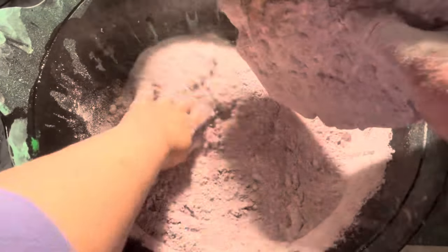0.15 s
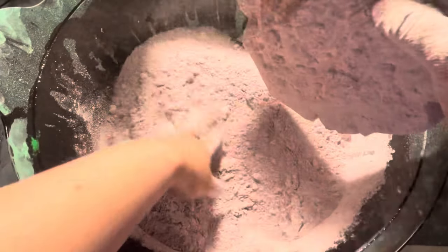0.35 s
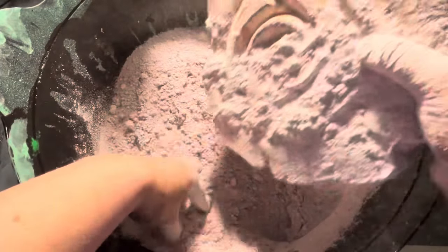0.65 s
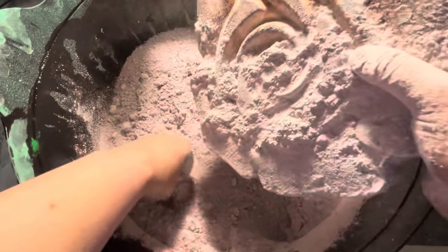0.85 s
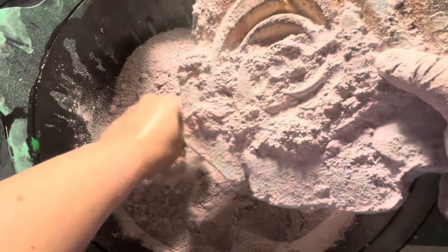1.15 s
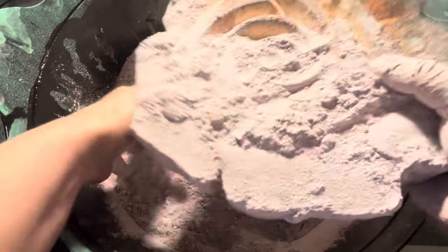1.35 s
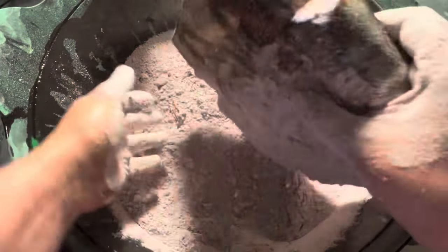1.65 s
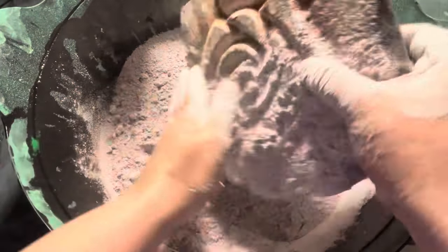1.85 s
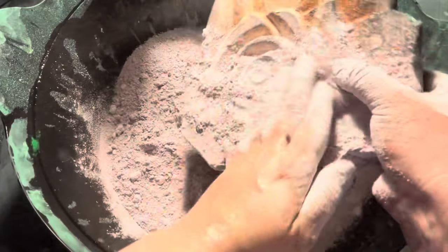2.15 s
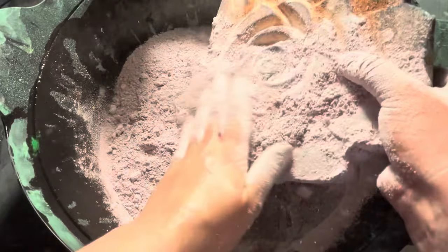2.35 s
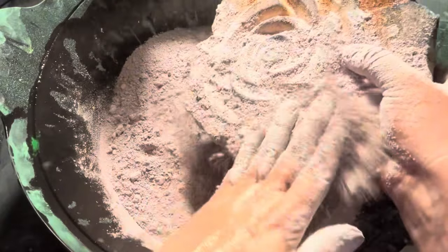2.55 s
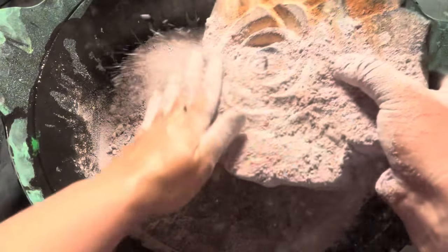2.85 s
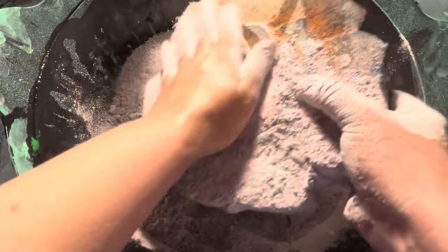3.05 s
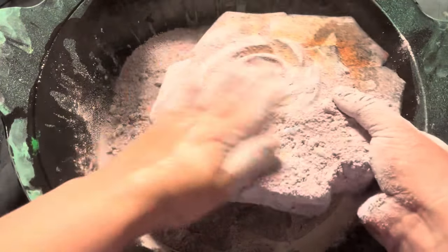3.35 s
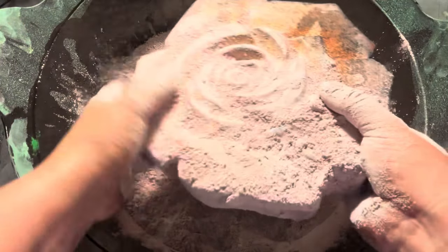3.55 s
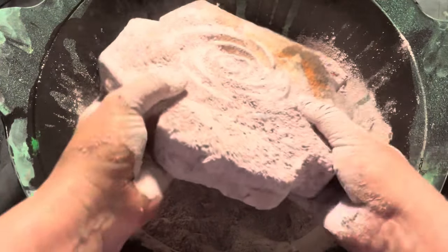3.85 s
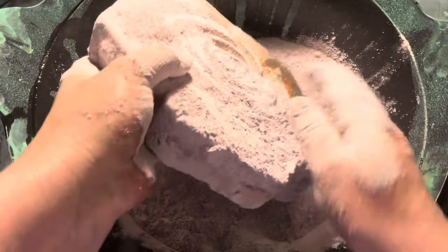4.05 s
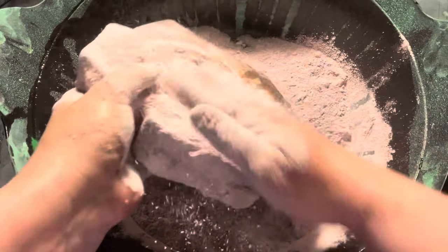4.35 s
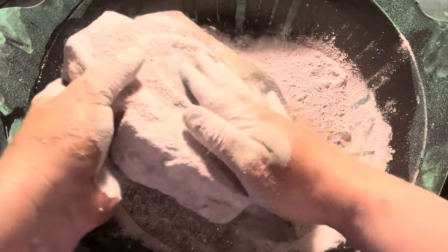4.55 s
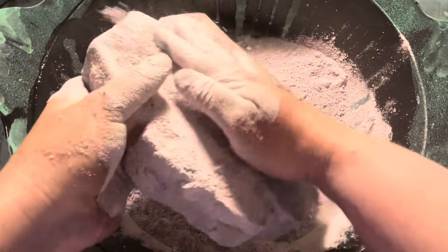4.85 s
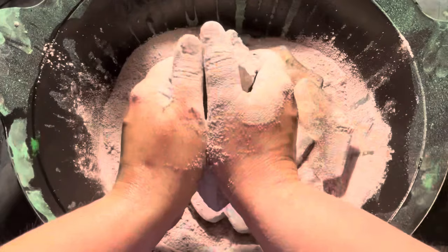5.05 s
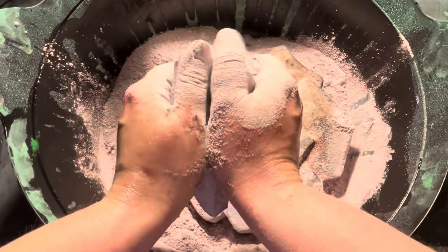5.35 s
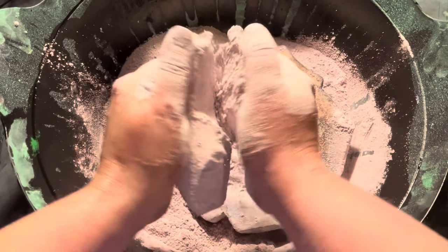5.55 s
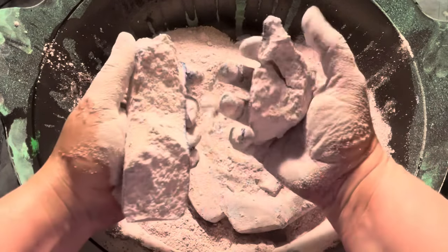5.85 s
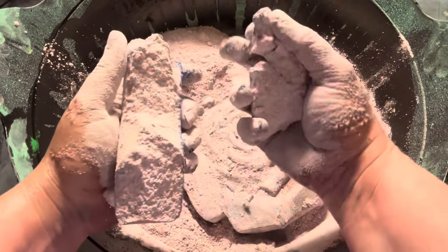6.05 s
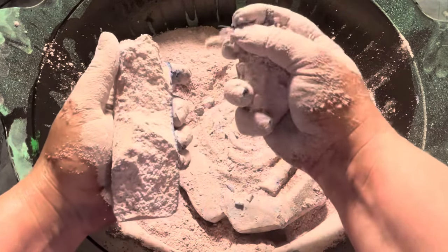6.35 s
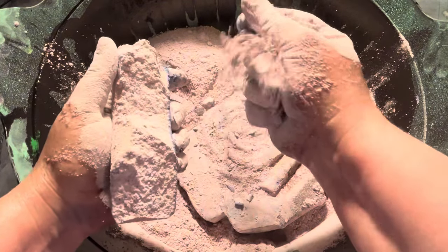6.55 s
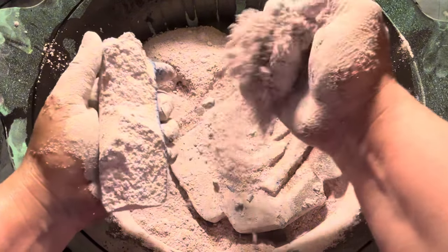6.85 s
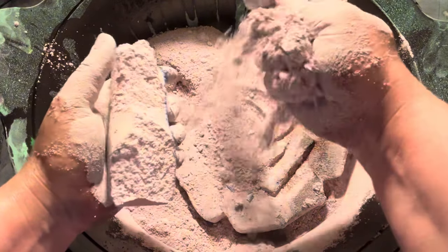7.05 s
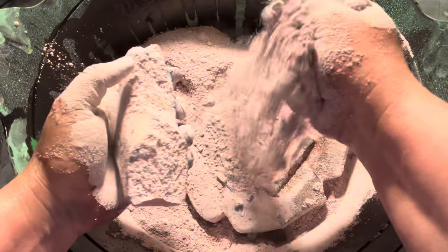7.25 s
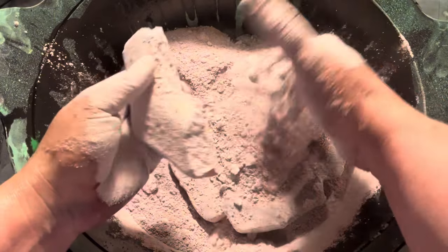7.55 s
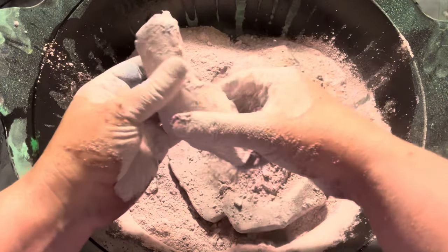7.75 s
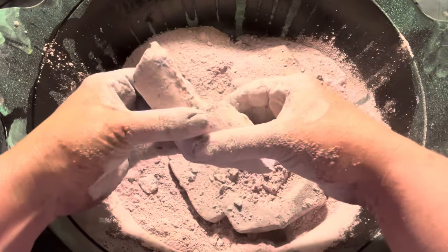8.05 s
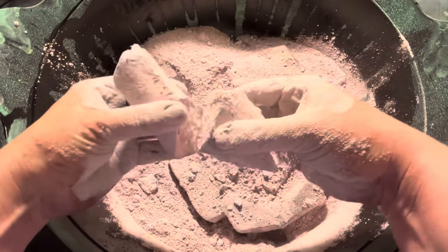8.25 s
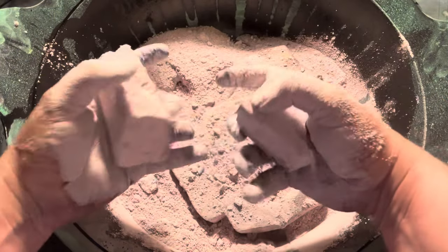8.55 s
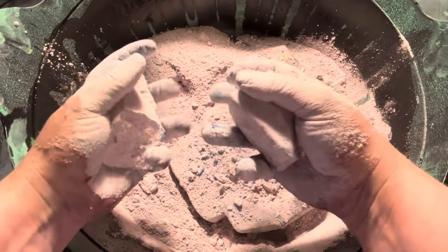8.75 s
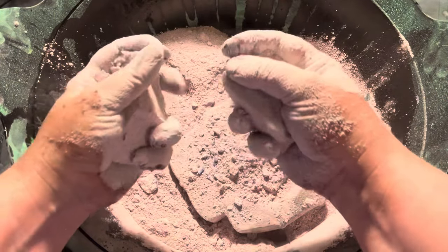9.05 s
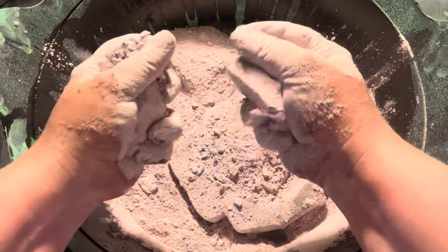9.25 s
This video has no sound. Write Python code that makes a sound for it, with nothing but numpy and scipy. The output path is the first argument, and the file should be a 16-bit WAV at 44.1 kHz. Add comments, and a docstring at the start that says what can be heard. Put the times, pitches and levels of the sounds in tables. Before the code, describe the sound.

A close, dry mono sound in a small room with faint steady hiss, low rumble and barely any reverberation. From 0 to 1.5 seconds a hand moves softly through loose chalk powder; squeaks chirp around 0.45-0.55, followed by a crack and dull knock at 0.6. From about 1.9 to 5 seconds a palm strokes a crusty slab in loud, sandy, bright swishes, first spaced, then quicker, with small snaps and a higher squeak near 3.8. From 5.3 lumps are squeezed, crackling and crumbling unevenly, with a solid knock at 6.7. Crumbs stream and patter into the tub around 7.1-7.5. A faint dusty slide leads to a sharp snap and short knock at 8.1, then soft sliding around 8.3-8.7. A strong crunch at 9.08 opens a last crumbling squeeze, fading by about 9.5.

```python
"""A small room's noise hiss and rumble run throughout. A hand digs in a tub of chalk powder, which squeaks;
a palm strokes a crusty slab; lumps are squeezed and crumble; crumbs and lumps fall back; broken faces slide.
Movements are filtered grain impacts and noise under swells, squeaks are unsteady sines.
Snaps, from the digging on, and landing lumps are noise volleys through a resonance; knocks are damped sines.
Close and mono, with a faint noise-tail room; both channels are the same."""
import sys
import numpy as np
from scipy import signal
from scipy.fft import rfft, irfft, next_fast_len
from scipy.io import wavfile
from scipy.ndimage import map_coordinates

SR = 44100
rng = np.random.default_rng(int(sys.argv[2]) if len(sys.argv) > 2 else 0)


def dump_mix(stems):
    """Bounce the given channels to the path in sys.argv[1] as a 16-bit WAV at rate SR."""
    frames = np.atleast_2d(stems).T  # one column per channel
    limited = np.clip(frames, -1, 1)  # hard clip at full scale
    pcm = np.round(limited * 32767).astype(np.int16)
    wavfile.write(sys.argv[1], SR, pcm)


N = 414981
EDGE_HZ = 4500  # coarse grit and impact body below, fine hiss and impact edge above
TOP_HZ = 15850  # band limit


def amp(db):
    """Decibels to gain."""
    return 10 ** (np.asarray(db) / 20)


def unit(x):
    """Scale to rms 1."""
    return x / np.sqrt(np.mean(x ** 2) + 1e-20)


def along(points, hz):
    """Interpolate (Hz, value) points on a log frequency axis."""
    point_hz, value = np.transpose(points)
    return np.interp(np.log(hz + 1), np.log(point_hz + 1), value)


def wobble(knots_per_s):
    """Smooth random curve through normally distributed knots."""
    knots = rng.standard_normal(int(N * knots_per_s / SR) + 4)
    return map_coordinates(knots, [np.arange(N) * knots_per_s / SR])


def below(hz, corner_hz):
    """Low-pass gain."""
    return 1 / np.sqrt(1 + (hz / corner_hz) ** 8)


def above(hz, corner_hz):
    """Power-complementary high-pass gain."""
    return np.sqrt(1 - below(hz, corner_hz) ** 2)


def filtered(x, gain):
    """Zero-phase colour for long sounds."""
    m = next_fast_len(N + SR // 4)
    return irfft(rfft(x, m) * gain(np.fft.rfftfreq(m, 1 / SR)), m)[:N]


def struck(x, gain, size=2048):
    """Minimum-phase colour for a short burst, by folding the cepstrum."""
    cepstrum = irfft(np.log(np.maximum(gain(np.fft.rfftfreq(size, 1 / SR)), 1e-3)))
    cepstrum[1:size // 2] *= 2
    cepstrum[size // 2 + 1:] = 0
    return irfft(rfft(x, size) * np.exp(rfft(cepstrum)))


# steady hiss and slow rumble spectra: (freq_hz, relative_level_db)
AIR_COLOUR = [(59, -35), (100, -6), (205, -6), (490, -5.5), (687, -5), (748, -4.5), (868, -5), (1170, -5),
              (2500, -4.5), (2670, -5.5), (2900, -5), (6090, -7), (7530, -8), (12500, -13), (15800, -21.5)]
RUMBLE_COLOUR = [(3, -13.5), (10, 6.5), (20, -8.5), (32, -11), (50, -19.5), (80, -21.5), (140, -49),
                 (300, -52)]


def background(air_db, rumble_db):
    """Steady hiss and deep, slow rumble: two coloured noises at fixed rms."""
    air = unit(filtered(rng.standard_normal(N), lambda hz: amp(along(AIR_COLOUR, hz))))
    rumble = unit(filtered(rng.standard_normal(N), lambda hz: amp(along(RUMBLE_COLOUR, hz))))
    return amp(air_db) * air + amp(rumble_db) * rumble


SWELL_SHAPE = 1.34  # exponent of build-up and fade: 1 exponential, 2 round bell


def swell(start_s, attack_s, hold_s, release_s):
    """Speed of one movement, 0-1: builds up until start_s, holds, dies away; attack and release are 1/e times."""
    t = np.arange(N) / SR - start_s
    before = -t / max(attack_s, 1e-3)
    after = (t - hold_s) / max(release_s, 1e-3)
    away = np.maximum(np.maximum(before, after), 0)
    speed, moving = np.zeros(N), away < 5
    speed[moving] = np.exp(-away[moving] ** SWELL_SHAPE)
    return speed


def movements(rows):
    """Gains of grit and hiss: both follow the hand's speed; overlapping movements add in power."""
    grit, hiss = np.zeros((2, N))
    for *timing, hiss_db, grit_over_hiss_db in rows:
        power = (amp(hiss_db) * swell(*timing)) ** 2
        hiss += power
        grit += power * amp(grit_over_hiss_db) ** 2
    return np.sqrt(grit), np.sqrt(hiss)


def grains(rate_per_s, spread_db):
    """Random tiny impacts, mostly small and a few large; rms 1."""
    sizes = amp(spread_db * np.minimum(rng.standard_normal(N), 2.5))
    hits = rng.random(N) < rate_per_s / SR
    return unit(hits * sizes * np.sign(rng.standard_normal(N)))


def chalk(rows, colour, rate_per_s, spread_db, dust, judder_db, echo, grit_gain_db, hiss_gain_db):
    """Grains break loose over a haze of dust; the moving hand mirrors their sound and shifts its colour."""
    grit_level, hiss_level = movements(rows)
    share = np.clip(dust, 0, 1)  # dust's share of the power

    def shower():
        return np.sqrt(1 - share) * grains(rate_per_s, spread_db) + np.sqrt(share) * rng.standard_normal(N)

    grit = unit(filtered(shower(), lambda hz: amp(along(colour, hz)) * below(hz, EDGE_HZ)))
    hiss = unit(filtered(shower(), lambda hz: amp(along(colour, hz)) * above(hz, EDGE_HZ) * (hz < TOP_HZ)))
    flow = amp(grit_gain_db) * grit_level * grit + amp(hiss_gain_db) * hiss_level * hiss
    flow *= unit(amp(judder_db * (wobble(70) + wobble(350))))  # the skin catches and slips
    delay_samples = 0.00069 * SR * np.exp(0.206 * wobble(5))  # path by way of the palm
    return flow + echo * np.interp(np.arange(N) - delay_samples, np.arange(N), flow)


# digging in loose powder; levels before the gains in dig():
# (start_s, attack_s, hold_s, release_s, hiss_level_db, grit_over_hiss_db), start_s = up to speed
DIG_MOVES = [(0.0, 0.02, 0.015, 0.097, -42, 3.5), (0.296, 0.042, 0.037, 0.031, -48.5, 9.5),
             (0.482, 0.034, 0.088, 0.012, -39.5, 2), (0.629, 0.0089, 0.02, 0.043, -38, 2.5),
             (0.852, 0.039, 0.044, 0.043, -43.5, 1), (1.041, 0.052, 0.022, 0.092, -39.5, -6),
             (1.222, 0.036, 0.04, 0.012, -33, -18), (1.41, 0.014, 0.014, 0.026, -48.5, 12)]
# colour of loose crumbs, also used by crush(): (freq_hz, relative_level_db)
CRUMB_COLOUR = [(300, -12), (900, -2.5), (1600, -1.5), (3000, 2), (4800, -6), (6500, -2.5), (8200, -4),
                (9600, -5.5), (11000, -12), (13500, -17), (15800, -23)]


def dig():
    """A hand moves through loose powder: sparse grains and dust."""
    return chalk(DIG_MOVES, CRUMB_COLOUR, rate_per_s=2000, spread_db=2.5, dust=0.58, judder_db=1.5,
                 echo=0.1, grit_gain_db=-2, hiss_gain_db=0.0)


# decay of the room: (freq_hz, t60_s)
ROOM_DECAY = [(200, 0.39), (3000, 0.11), (12000, 0.042)]


def room(x, delay_s):
    """The walls answer faintly: a noise tail whose treble dies first."""
    hz, t, cells = signal.stft(rng.standard_normal(SR // 3), SR, nperseg=256)
    decay = amp(-60 * t / along(ROOM_DECAY, hz)[:, None])
    tail = signal.istft(cells * decay, SR, nperseg=256)[1]
    delayed = np.pad(x, (round(delay_s * SR), 0))
    return signal.fftconvolve(delayed, tail / np.linalg.norm(tail))[:N]


def squeak(start_s, attack_s, hold_s, release_s, pitch_hz, tone_db, jitter_hz, overtone_db, rough_db, scrape_db):
    """Packed powder sticks and slips at an unsteady pitch; every slip scrapes a few grains."""
    phase = 2 * np.pi * np.cumsum(pitch_hz + jitter_hz * wobble(1200)) / SR
    tone = np.sin(phase) + amp(overtone_db) * np.sin(2 * phase)
    tone = unit(tone * amp(rough_db * wobble(500)))
    slips = rng.standard_normal(N) * (1 + np.cos(phase))
    scrape = unit(filtered(slips, lambda hz: above(hz, 600) * below(hz, 3800)))
    return amp(tone_db) * swell(start_s, attack_s, hold_s, release_s) * (tone + amp(scrape_db) * scrape)


# packed powder slips under the fingers: (start_s, attack_s, hold_s, release_s, pitch_hz, level_db)
SQUEAK_SLIPS = [(.442, .004, .003, .007, 1280, -37), (0.477, .006, .008, .028, 1490, -31.5),
                (0.542, .012, 0.023, 0.0094, 1390, -30.5), (3.828, 0.013, 0.024, .01, 3100, -34)]


def squeaks():
    """Every slip of packed powder, with shared tone settings."""
    return sum(squeak(*slip, jitter_hz=191, overtone_db=-24, rough_db=2, scrape_db=-8)
               for slip in SQUEAK_SLIPS)


# colour of a cracking or landing lump: (freq_hz, relative_level_db)
LUMP_COLOUR = [(200, -11.5), (400, -11.5), (850, -7), (1350, 0.5), (1750, -1.5), (2300, 1), (4500, -1),
               (8500, 2), (11000, -6.5), (15800, -18)]


def volleys(rows, ring_db, ring_width, fade_s, fade_share, gain_db, size=2048):
    """A lump cracks or lands as a volley of tiny jolts, and the piece rings briefly."""
    out, t = np.zeros(N + size), np.arange(size) / SR
    window = SR // 100
    for start_s, run_s, ring_hz, body_db, edge_db in rows:
        jolts, sizes = rng.standard_normal((2, size))
        running = np.exp(-(t / max(run_s, 1e-4)) ** 2) + fade_share * np.exp(-t / fade_s)
        volley = jolts * amp(2.1 * sizes) * running
        volley[0] += 5  # sharp onset

        def piece(hz):
            peak_db = ring_db / (1 + ((hz / ring_hz - 1) / ring_width) ** 2)
            return amp(along(LUMP_COLOUR, hz) + peak_db)

        body = struck(volley, lambda hz: piece(hz) * below(hz, EDGE_HZ))
        edge = struck(volley, lambda hz: piece(hz) * above(hz, EDGE_HZ))
        burst = amp(body_db) * unit(body) + amp(edge_db) * unit(edge)
        # row levels are rms as if all the energy fell in the 10 ms window
        out[round(start_s * SR):][:size] += amp(gain_db) * burst * np.sqrt(window / size)
    return out[:N]


# loudest cracks of lumps, and lumps landing in the tub during the pour; levels before gain_db:
# (start_s, run_s, ring_hz, body_level_db, edge_level_db)
LUMP_HITS = [(.6251, 0.0041, 3320, -20, -24), (1.877, 0.003, 7300, -39, -25.5),
             (1.948, 0.0071, 3520, -27, -19), (2.5952, 0.0042, 7300, -31, -30),
             (2.7834, 0.0018, 2880, -28.5, -27.5), (3.344, .0066, 7140, -31, -20.5),
             (4.302, 0.0056, 7100, -26.5, -20), (4.5745, .006, 4500, -20.5, -28),
             (4.622, 0.0027, 7400, -36, -19), (4.918, .005, 4500, -19, -29),
             (5.2944, 0.005, 6600, -26, -24), (5.506, 0.0041, 6800, -42, -34),
             (5.7023, 0.004, 7700, -26.5, -21), (5.736, .0035, 6800, -37, -30),
             (6.0548, 0.0043, 7800, -36, -31), (6.1495, .0029, 4470, -44, -30),
             (6.3369, .0027, 8300, -50, -35), (6.5478, 0.0022, 7240, -42, -30),
             (6.637, .0018, 6200, -35, -32), (6.6555, .0039, 8000, -37, -27),
             (6.688, 0.0033, 7900, -37, -24), (6.7058, 0.006, 2270, -21, -29),
             (6.7668, .0041, 7600, -45, -34), (6.811, 0.0031, 5900, -38, -34),
             (6.918, .002, 7500, -40, -32), (6.9772, .0044, 6400, -34.5, -30),
             (7.0017, 0.0029, 8150, -53, -25), (7.013, 0.0046, 6300, -30.5, -25),
             (7.0444, 0.0046, 7900, -38, -28), (7.0595, 0.0014, 8000, -46, -29),
             (7.1375, 0.00028, 4240, -29, -24), (7.232, 0.00062, 2900, -27.5, -30),
             (7.318, .0011, 3860, -24.5, -29), (7.413, .003, 7500, -45, -28),
             (7.4638, .004, 9400, -47, -30.5), (8.0993, 0.0035, 6200, -28.5, -17.5),
             (8.7368, 0.0074, 6500, -35, -32), (8.7543, 0.0006, 6800, -44, -32.5),
             (8.808, .0015, 3120, -31, -35.5), (8.9719, 0.0024, 1480, -30.5, -36),
             (9.0164, 0.0037, 1490, -31, -40), (9.0607, 0.0033, 5900, -36, -36),
             (9.0781, 0.0037, 5530, -19, -20.5), (9.1448, 0.0088, 7050, -31.5, -29.5),
             (9.1925, .0077, 6000, -28, -28), (9.3935, .0024, 4600, -34, -30)]


def snaps_and_landings():
    """Loudest cracks of lumps, and lumps landing in the tub during the pour, at set times."""
    return volleys(LUMP_HITS, ring_db=8.5, ring_width=0.2, fade_s=0.0071, fade_share=0.21, gain_db=2.0)


# dull knocks of heavier pieces, levels before onset and high-pass: (start_s, pitch_hz, level_db, t60_s)
KNOCK_HITS = [(.6258, 635, -22, 0.016), (.894, 403, -24.5, 0.023), (3.831, 570, -26, .023),
              (4.302, 430, -20, 0.026), (4.622, 510, -23, .016), (5.7035, 395, -23.5, 0.021),
              (6.7062, 696, -9.5, 0.015), (6.7066, 447, -20, 0.03), (8.0992, 450, -7, 0.0089),
              (9.0787, 513, -17, 0.011)]


def knocks(contact_s, lowest_hz):
    """Hand and powder damp the heavy pieces within a few cycles; they are too small to radiate bass."""
    out, t = np.zeros(N + SR), np.arange(SR // 25) / SR
    for start_s, pitch_hz, level_db, t60_s in KNOCK_HITS:
        envelope = amp(level_db - 60 * t / t60_s) * (1 - np.exp(-t / contact_s))
        ring = envelope * np.sin(2 * np.pi * pitch_hz * t)
        knock = struck(ring, lambda hz: above(hz, lowest_hz))
        out[round(start_s * SR):][:len(knock)] += knock
    return out[:N]


# palm strokes over the slab, levels before the gains in rub():
# (start_s, attack_s, hold_s, release_s, hiss_level_db, grit_over_hiss_db), start_s = up to speed
RUB_STROKES = [(1.945, 0.042, 0.006, 0.052, -15.0, -9.5), (1.997, 0.029, 0.059, 0.051, -23.5, -6.5),
               (2.214, 0.026, 0.064, 0.033, -21.5, -6), (2.409, 0.036, 0.039, 0.027, -20.5, -4.5),
               (2.634, 0.034, 0.053, 0.1, -22, -5.0), (2.971, 0.088, 0.041, 0.061, -19.5, -10),
               (3.113, 0.034, 0.09, 0.048, -18, -10.5), (3.292, 0.034, 0.022, 0.11, -20.5, -9),
               (3.672, 0.026, 0.005, 0.062, -25.5, -11.5), (3.835, 0.031, 0.0099, 0.017, -24.5, -16),
               (4.062, 0.0041, 0.013, 0.044, -23.5, -7.5), (4.194, 0.047, 0.06, 0.033, -25.5, -8),
               (4.288, 0.032, 0.054, 0.033, -19.5, -6.5), (4.435, 0.012, 0.04, 0.022, -19.0, -8.5),
               (4.581, 0.019, 0.037, 0.029, -16.5, -9), (4.71, 0.041, 0.035, 0.034, -17.5, -11),
               (4.847, 0.023, 0.08, 0.031, -14.5, -9.5)]
# colour of the slab: (freq_hz, relative_level_db)
SLAB_COLOUR = [(210, -47), (350, -28), (398, -18), (592, -13.5), (673, -18.5), (925, -12.5), (1180, -17),
               (1450, -11), (1750, -9.5), (3210, -3.5), (5340, -7.5), (6680, -2), (8220, -1.5),
               (13900, -20), (15800, -26)]


def rub():
    """A palm strokes the crusty slab: dense grains of similar size."""
    return chalk(RUB_STROKES, SLAB_COLOUR, rate_per_s=7000, spread_db=2.5, dust=0.52, judder_db=1.0,
                 echo=0.26, grit_gain_db=0.37, hiss_gain_db=0.0)


def crumbs(rows, rate_per_s, run_s, ring_hz, ring_scatter, body_db, edge_db, scatter_db, count=24):
    """Small hits at random while a movement lasts, louder the harder it is; rows for volleys()."""
    hits = []
    for start_s, attack_s, hold_s, release_s, hiss_db, grit_over_hiss_db in rows:
        when, chance = rng.random((2, count))
        loudness, ring, run = np.clip(rng.standard_normal((3, count)), -2, 2)
        length_s = attack_s + hold_s + release_s
        times_s = start_s - attack_s + when * length_s
        level_db = hiss_db + scatter_db * loudness
        drawn = np.transpose([times_s, run_s * np.exp(run / 2), ring_hz * np.exp(ring_scatter * ring),
                              level_db + grit_over_hiss_db + body_db, level_db + edge_db])
        kept = (chance < rate_per_s * length_s / count) & (times_s > 0) & (times_s < N / SR)
        hits += list(drawn[kept])
    return hits


def ticks(hits):
    """Small volleys with a quickly fading tail."""
    return volleys(hits, ring_db=10, ring_width=0.28, fade_s=0.002, fade_share=0.1, gain_db=1)


# squeezes of lumps in the fist, levels before the gains in crush():
# (start_s, attack_s, hold_s, release_s, hiss_level_db, grit_over_hiss_db), start_s = full grip
CRUSH_SQUEEZES = [(5.271, 0.0069, 0.036, 0.032, -30.5, -7.5), (5.514, 0.044, 0.081, 0.053, -39, -9),
                  (5.718, 0.034, 0.22, 0.11, -39.5, -8.5), (6.051, 0.011, 0.021, 0.051, -32, -11),
                  (6.381, 0.087, 0.076, 0.024, -34.5, -1.5), (6.513, 0.046, 0.25, 0.115, -33.0, -9.5),
                  (6.963, 0.107, 0.113, 0.087, -32, -10), (8.982, 0.017, 0.085, 0.061, -39.5, -5),
                  (9.184, 0.01, 0.0069, 0.045, -31, 0.0), (9.293, 0.059, 0.11, 0.041, -35.5, -6)]


def crush():
    """Squeezed lumps crumble: sparse uneven grains plus random small fractures."""
    flow = chalk(CRUSH_SQUEEZES, CRUMB_COLOUR, rate_per_s=800, spread_db=5.0, dust=0.55, judder_db=2.3,
                 echo=0.27, grit_gain_db=-0.5, hiss_gain_db=-0.5)
    crumbling = crumbs(CRUSH_SQUEEZES, rate_per_s=20, run_s=0.0011, ring_hz=7040, ring_scatter=0.28,
                       body_db=0, edge_db=-3.0, scatter_db=1.0)
    return flow + ticks(crumbling)


# the fist opens and crumbs stream into the tub, levels before the gains in pour():
# (start_s, attack_s, hold_s, release_s, hiss_level_db, grit_over_hiss_db), start_s = full flow
POUR_STREAMS = [(7.217, 0.1, 0.046, 0.035, -32, -5), (7.281, 0.037, 0.201, 0.088, -30, -6)]
# colour of the falling stream: (freq_hz, relative_level_db)
STREAM_COLOUR = [(400, -23), (1100, -17), (1900, -4), (3200, 0.5), (4800, -7), (6500, 1.5), (8000, 3),
                 (9600, 0.5), (10800, -6.5), (13500, -13), (15800, -20)]


def pour():
    """Crumbs stream into the tub: uneven grains plus random lower-pitched landings."""
    flow = chalk(POUR_STREAMS, STREAM_COLOUR, rate_per_s=1300, spread_db=4.5, dust=0.41, judder_db=1.5,
                 echo=0.24, grit_gain_db=-1.5, hiss_gain_db=0.5)
    landing = crumbs(POUR_STREAMS, rate_per_s=22, run_s=0.00048, ring_hz=2920, ring_scatter=0.24,
                     body_db=2, edge_db=-10, scatter_db=-2.0)
    return flow + ticks(landing)


# broken faces and fingers slide over each other, levels before the gains in slide():
# (start_s, attack_s, hold_s, release_s, hiss_level_db, grit_over_hiss_db), start_s = up to speed
SLIDE_MOVES = [(7.775, 0.093, 0.068, 0.075, -38.5, -16), (8.359, 0.046, 0.023, 0.018, -31.5, -15),
               (8.421, 0.033, 0.091, 0.037, -38.5, -10), (8.522, 0.02, 0.07, 0.034, -33, -13.0),
               (8.667, 0.022, 0.0096, 0.018, -33.5, -11.0)]
# colour of dusty faces sliding: (freq_hz, relative_level_db)
FACE_COLOUR = [(500, -24), (2000, -12), (3800, -4.5), (6000, -1.5), (8500, -0.5), (11000, -9), (13500, -10),
               (15800, -22)]


def slide():
    """Dusty faces slide: mostly dust, with a strong reflection from the hand."""
    return chalk(SLIDE_MOVES, FACE_COLOUR, rate_per_s=7400, spread_db=4, dust=0.82, judder_db=2,
                 echo=0.51, grit_gain_db=0, hiss_gain_db=0.5)


def scene():
    """All sources close up, plus room and background, the same in both channels."""
    floor = background(air_db=-37.5, rumble_db=-39)
    near = dig() + squeaks() + snaps_and_landings() + knocks(contact_s=0.00053, lowest_hz=220)
    near = near + rub() + crush() + pour() + slide()
    mono = near + amp(-20.5) * room(near, delay_s=0.014) + floor
    return np.array([mono, mono])


def record(dry):
    """Sharp band limit: nothing passes at or above TOP_HZ."""
    return np.array([filtered(side, lambda hz: hz < TOP_HZ) for side in dry])


dry = scene()
out = record(dry)
dump_mix(out)
```